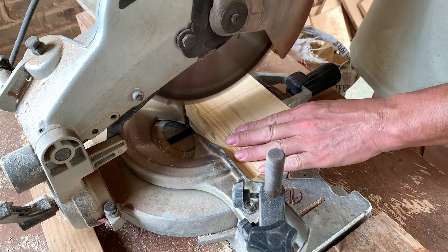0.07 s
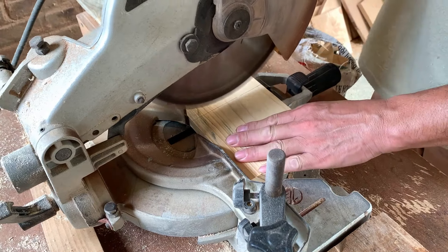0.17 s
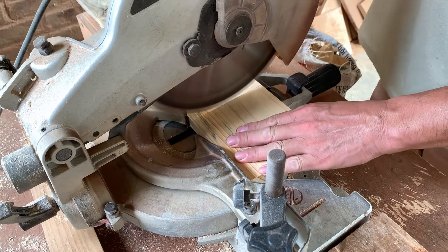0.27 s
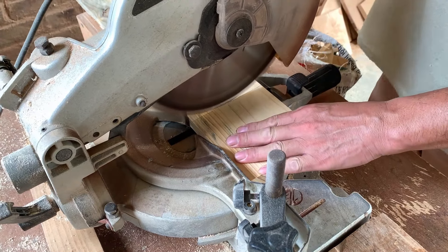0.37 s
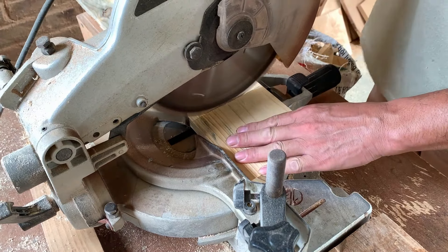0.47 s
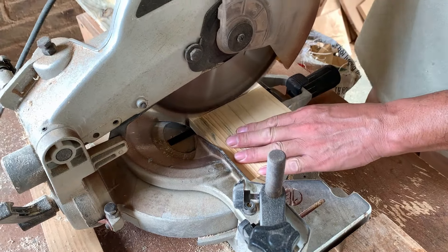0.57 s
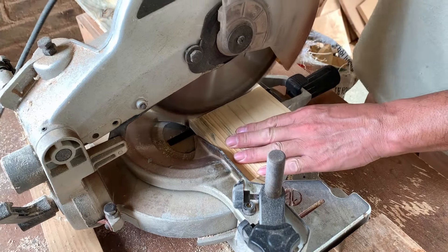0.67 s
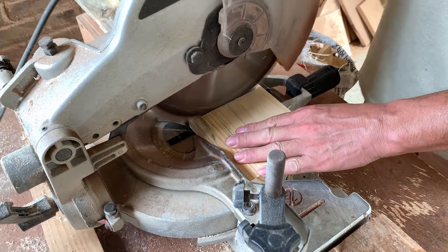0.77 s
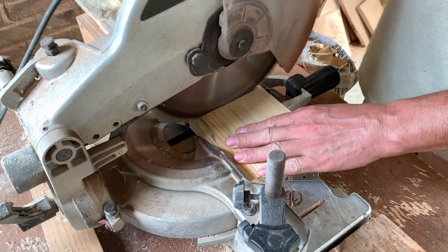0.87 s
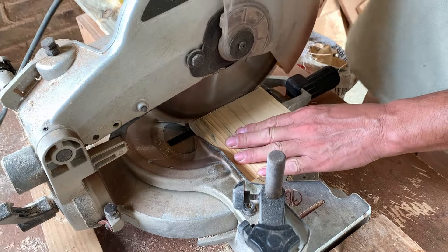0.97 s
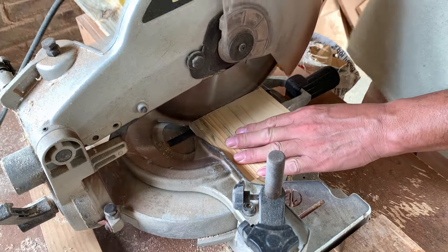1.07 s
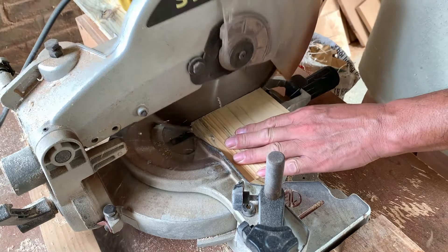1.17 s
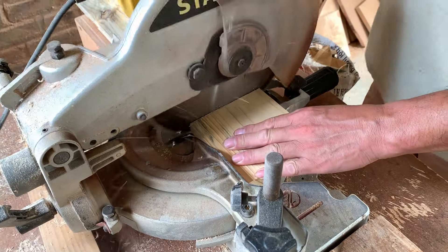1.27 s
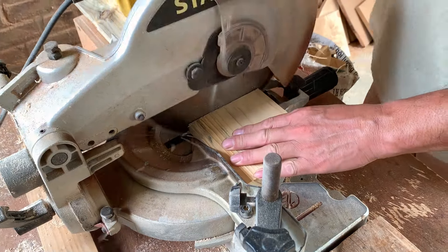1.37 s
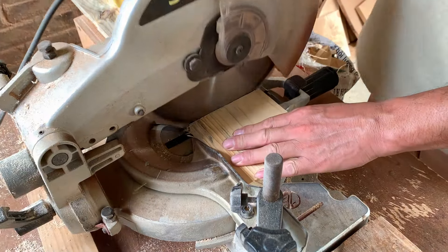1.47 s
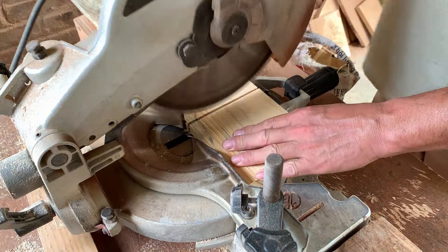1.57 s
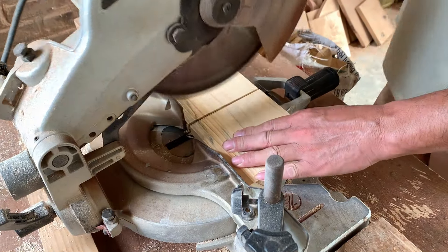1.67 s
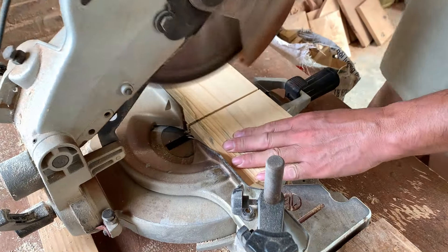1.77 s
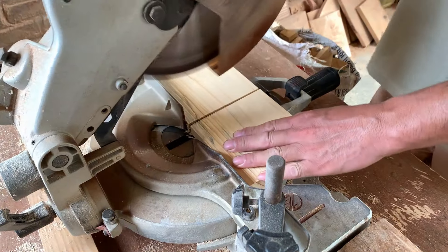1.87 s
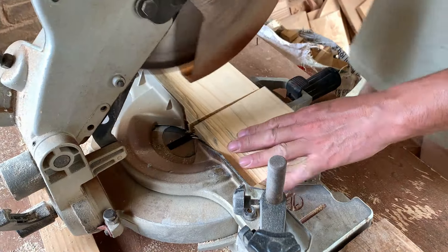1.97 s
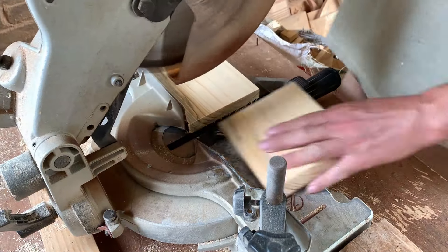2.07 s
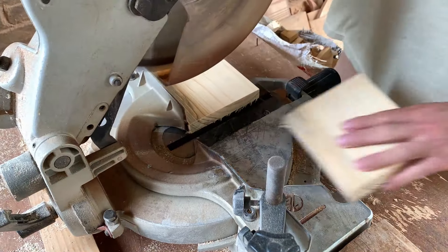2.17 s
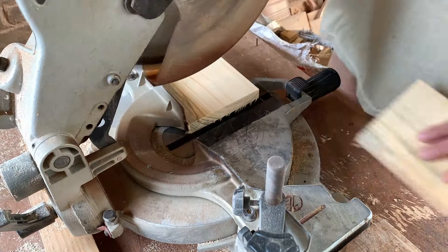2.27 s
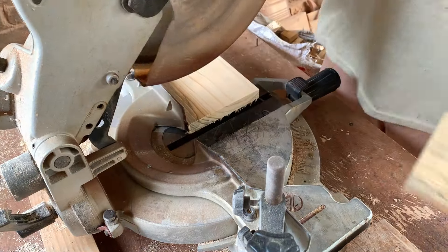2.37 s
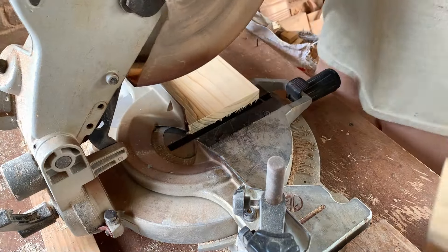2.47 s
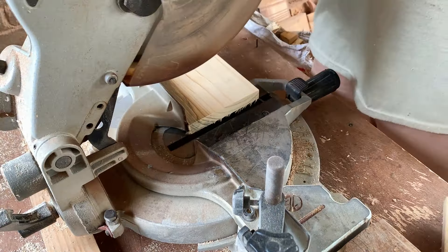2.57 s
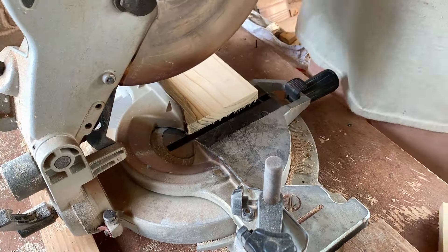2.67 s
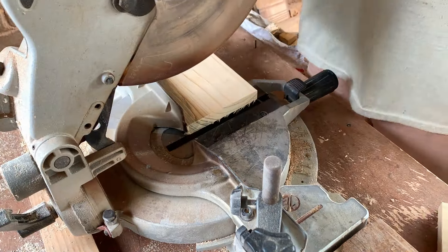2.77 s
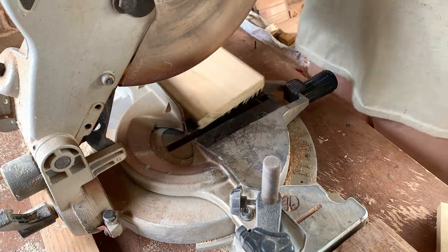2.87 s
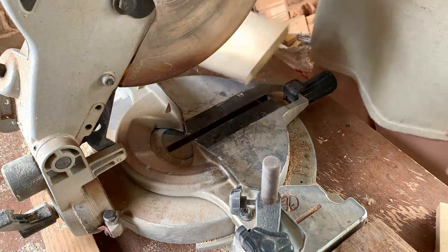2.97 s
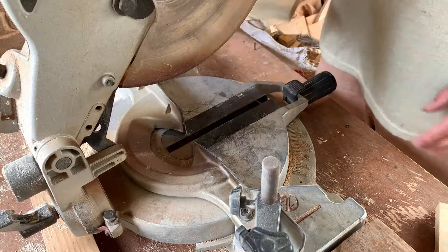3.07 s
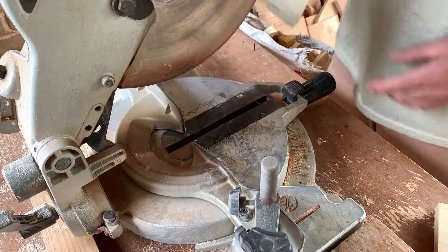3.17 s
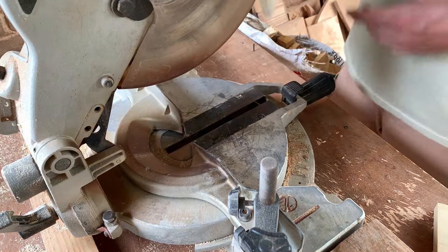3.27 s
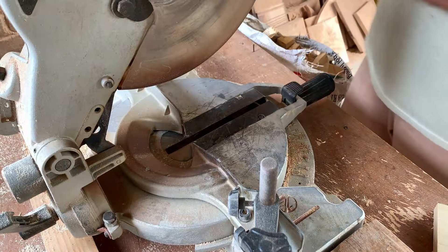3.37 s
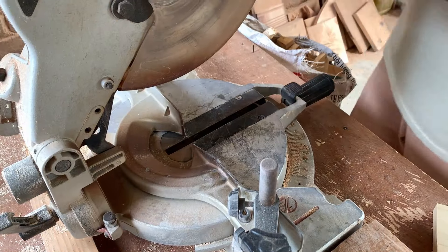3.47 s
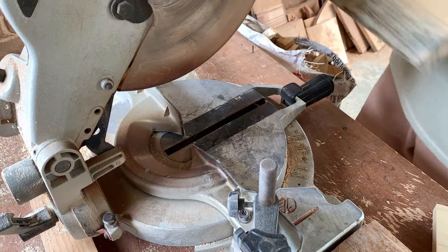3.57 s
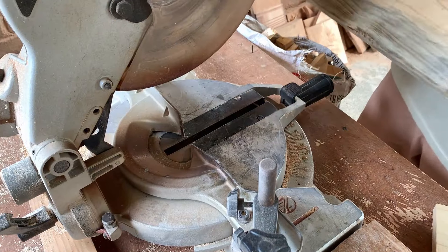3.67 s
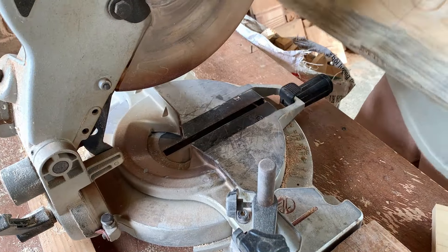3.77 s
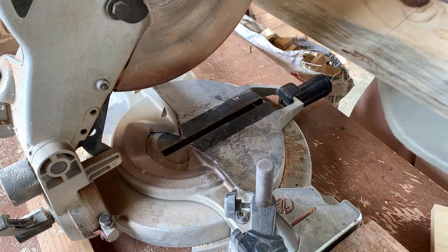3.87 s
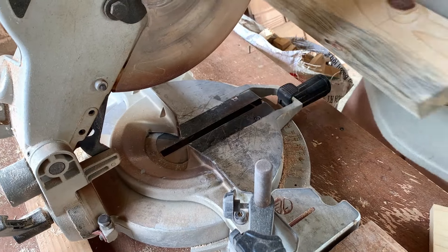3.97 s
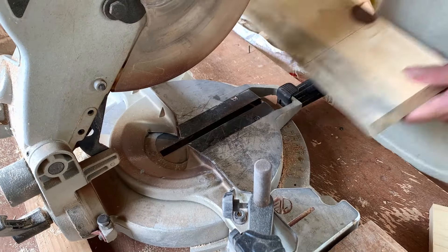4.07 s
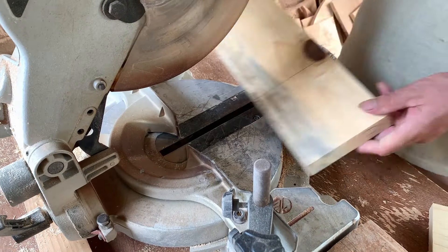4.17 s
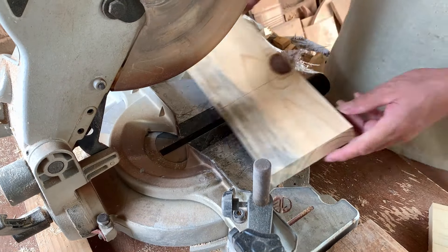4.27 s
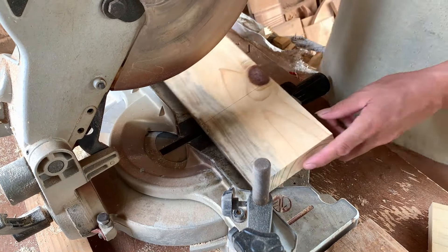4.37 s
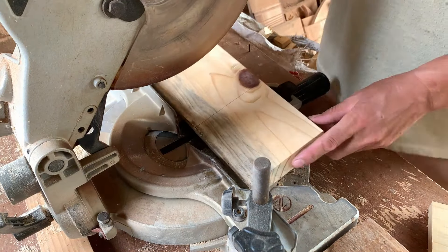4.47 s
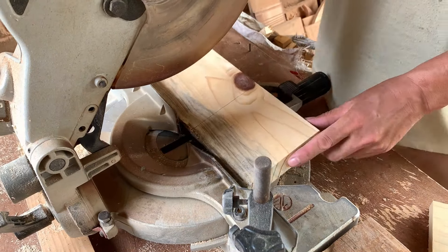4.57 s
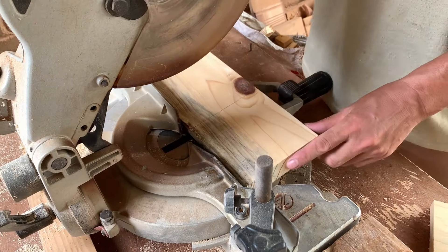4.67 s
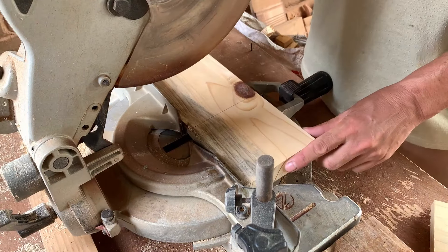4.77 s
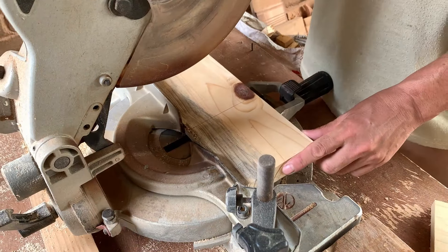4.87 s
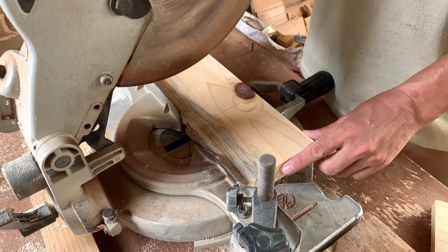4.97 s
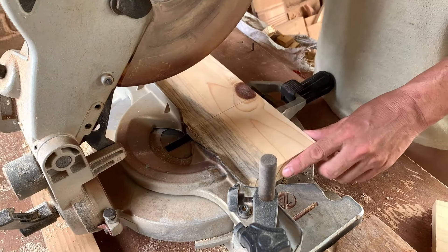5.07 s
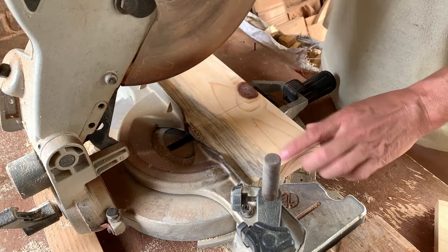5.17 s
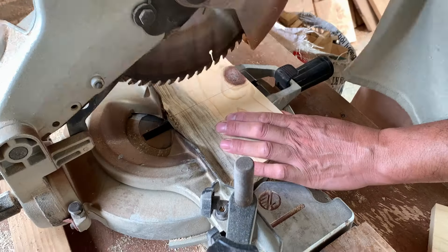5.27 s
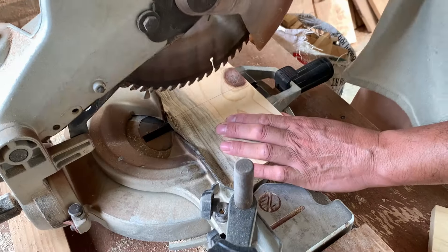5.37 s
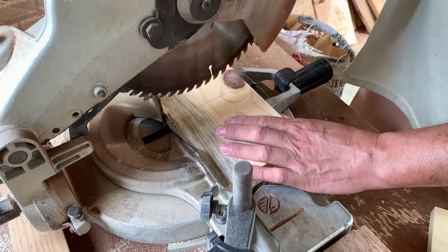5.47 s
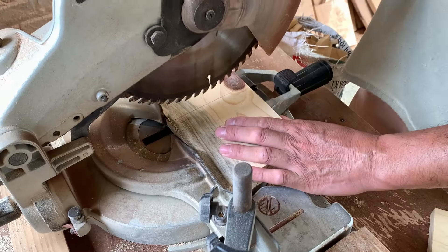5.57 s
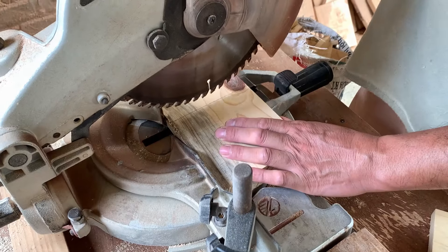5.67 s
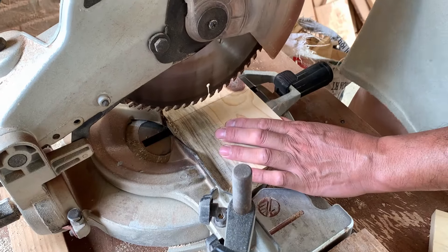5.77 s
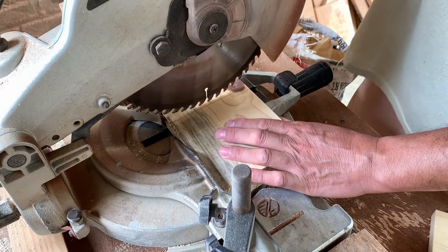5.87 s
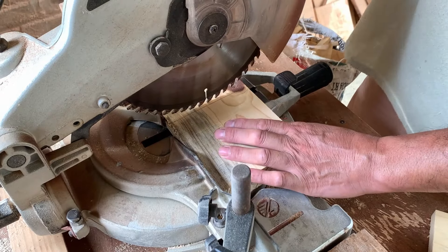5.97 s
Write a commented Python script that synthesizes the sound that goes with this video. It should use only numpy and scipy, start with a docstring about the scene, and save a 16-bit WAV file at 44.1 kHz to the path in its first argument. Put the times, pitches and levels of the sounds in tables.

```python
"""Miter saw cutting a pine block

A miter saw runs up, bogs down in a pine block, recovers and is switched off in a workshop.
Gear whine follows the motor speed as tones swept through fixed resonances; hiss and air are coloured noise.
Teeth rasp and ring the blade, and slack gears clash in bursts, many of them in step with the coasting blade.
Boards knock and slide as damped or swelling noise; the saw noise stops abruptly, leaving a faint far call
of three harmonics and one small metal ping of decaying modes."""
import sys
import numpy as np
from scipy import signal
from scipy.fft import rfft, irfft
from scipy.io import wavfile
from scipy.ndimage import uniform_filter1d, map_coordinates

SR = 44100
rng = np.random.default_rng(int(sys.argv[2]) if len(sys.argv) > 2 else 0)


def master_out(mix):
    """Clip the mix to full scale and print it as 16-bit PCM to the path in sys.argv[1]."""
    frames = np.transpose(np.atleast_2d(mix))
    ceiling = np.clip(frames, -1, 1)
    pcm = np.round(ceiling * 32767).astype(np.int16)
    wavfile.write(sys.argv[1], SR, pcm)


N = 265878
T = np.arange(N) / SR  # time [s]
HZ = np.maximum(np.fft.rfftfreq(N, 1 / SR), 1)  # spectrum frequencies [Hz]

# release of the switch: (time [s], gear mesh frequency [Hz])
RELEASE = (1.56, 2530)


def undb(db):
    """Logarithmic level: decibels to amplitude gain."""
    return 10 ** (np.asarray(db) / 20)


def curves(table):
    """Linear interpolation: each column of a table joined by straight lines in time."""
    s, *columns = np.transpose(table)
    return [np.interp(T, s, column) for column in columns]


def slope(points):
    """Spectral envelope: dB joined by straight lines on a log-frequency axis."""
    hz, db = np.transpose(points)
    return np.interp(np.log(HZ), np.log(hz), db)


def bumps(modes):
    """Resonance: bell-shaped peaks and dips in dB, summed."""
    return sum(db / (1 + (2 * (HZ - hz) / width) ** 2) for hz, width, db in modes)


def noise(db, likeness=0.033):
    """Diffuse field: coloured stereo noise of rms 1, nearly unrelated at the two ears."""
    white = rng.standard_normal((2, N))
    mixed = white + likeness * white[::-1]
    coloured = irfft(rfft(mixed) * undb(db), N)
    return coloured / coloured.std()


def walk(rate, channels=1):
    """Random modulation: smoothed steps at a rate in Hz, with a spread near 0.8."""
    step = max(int(SR / rate), 2)
    held = np.repeat(rng.standard_normal((channels, N // step + 1)), step, axis=1)
    return 1.01 * uniform_filter1d(held, step)[:, :N]


def turns(hz):
    """Phase as the integral of frequency: cycles run so far."""
    return np.cumsum(hz) / SR


def burst(s, length, rise=0.53, tail=0.4):
    """Transient envelope: a hyperbolic-secant swell with its peak at s and separate rise and tail."""
    out = np.zeros(N)
    near = slice(max(int((s - 4 * length) * SR), 0), int((s + 6 * length) * SR))
    u = (T[near] - s) / length
    out[near] = 1 / np.cosh(u / np.where(u < 0, rise, tail))
    return out


def tone(hz, blur=.8, blur_hz=90):
    """Multipath fading: a line reaches each ear by many paths, so its size and phase flutter."""
    paths = 1 + blur * (walk(blur_hz, channels=2) + 1j * walk(blur_hz, channels=2))
    carrier = np.exp(2j * np.pi * (turns(hz) + rng.random((2, 1))))
    line = np.real(paths / np.abs(paths) ** 0.13 * carrier)  # the power evens the size slightly
    return line / line.std()


def waver(x, depth_s, rate_hz=28):
    """Doppler-like shift: a wandering delay bends every pitch a little."""
    place = (T + depth_s * walk(rate_hz)[0]) * SR
    return np.array([map_coordinates(ear, [place], order=3, mode="mirror") for ear in x])


def reflections(share_db, count=40):
    """Comb filtering: close echoes from table, guard and bench ripple the spectrum at each ear."""
    echoes = np.zeros((2, N))
    for ear in echoes:
        lag = rng.uniform(0.0009975, .02, count)  # s
        ear[(lag * SR).astype(int)] = rng.standard_normal(count) * np.exp(-lag / .008)
    echoes = echoes / np.linalg.norm(echoes, axis=1, keepdims=True)
    response = 1 + rfft(echoes * undb(share_db))
    return response / np.sqrt(np.mean(np.abs(response) ** 2))


def speed():
    """Rotor dynamics: driven until release, then braked by steady friction and speed-proportional drag."""
    # motor speed under power, sagging in the wood: (time [s], gear mesh frequency [Hz])
    powered = [(0, 1340), (.1, 1795), (.22, 2200), (.38, 2527), (.6, 2484), (.95, 2282), (1.29, 1960),
               (1.45, 2390)]
    friction_hz_per_s, drag_per_s = 196, .2
    driven_hz, = curves(powered + [RELEASE])
    coasted = np.maximum(T - RELEASE[0], 0)
    friction_hz = friction_hz_per_s / drag_per_s
    return (driven_hz + friction_hz) * np.exp(-drag_per_s * coasted) - friction_hz


def gears(mesh_hz):
    """Gear meshing: harmonics of the tooth rate, smeared as the shaft jerks within its backlash."""
    # force on the gear teeth, greatest while the motor accelerates: (time [s], relative level [dB])
    tooth_load = [(0, -30), (.28, -23), (.48, -39), (.8, -43), (1.25, -49), (1.42, -40.5), (1.57, -51),
                  (1.71, -45.5), (1.86, -53), (2.2, -47.5), (2.6, -55.5), (5.35, -54.5)]
    # relative strength of mesh tone, octave and twelfth: level [dB]
    order_levels = [-0.5, -0.5, -3]
    # how well the gear case radiates a tone: (frequency [Hz], gain [dB])
    case = [(750, -5.5), (930, 2.5), (1130, -9), (1400, -3.5), (1650, -5), (1850, -8), (2050, -2),
            (2250, 1), (2430, 5.5), (2750, -2), (3300, -5.5), (4100, 1), (4500, 0), (4900, 7.5),
            (5500, -2.5), (6400, 2.5), (7400, -8)]
    overtone_db_per_octave = 2.5  # slower teeth strike more softly, so overtones fade with the speed
    fading_db = 2.5  # each tone comes and goes on its own

    load_db, = curves(tooth_load)
    soft_db = overtone_db_per_octave * np.log2(mesh_hz / RELEASE[1])
    jerk_hz = np.interp(T, [0, .3, 1.4], [100, 48, 38])
    jerky_hz = mesh_hz + jerk_hz * walk(190)[0]
    whine = 0
    for k, db in enumerate(order_levels):
        line = tone((k + 1) * jerky_hz, blur=1.2, blur_hz=170)
        whine = whine + line * undb(load_db + db + k * soft_db + fading_db * walk(35))
    # the resonances and ripple of the gear case colour the gliding tones
    return irfft(rfft(whine) * undb(slope(case)) * reflections(-4), N)


def chatter(mesh_hz):
    """Backlash impact: slack gears clash in bouts timed by blade turns, and in single hard blows."""
    # bouts of rattle: (first clash [s], end [s], interval [blade turns], level [dB])
    rattles = [(1.662, 1.775, 2.04, -29.5), (1.839, 1.98, 2.01, -34), (1.996, 2.325, 2.01, -37),
               (2.368, 2.665, 2.03, -35), (2.7, 2.95, 2.015, -37), (2.961, 3.1, 1, -33.5),
               (3.199, 3.4, 1.94, -35), (3.417, 3.54, 1.32, -36), (3.555, 3.73, .99, -35.5),
               (3.753, 3.94, 1.2, -36), (3.976, 4.065, 1, -34), (4.136, 4.28, .96, -35.5),
               (4.356, 4.58, .99, -35), (4.602, 4.86, 1.01, -38.5), (4.94, 5.04, 1.15, -37)]
    # single hard clashes: (time [s], level [dB], length [s])
    blows = [(0.031, -17.5, 0.0033), (.072, -24, .0036), (0.218, -19.5, 0.0083), (1.461, -30.5, .003),
             (1.497, -34, 0.0034), (1.537, -32.5, .009), (1.708, -35, .006), (1.728, -42, 0.0013),
             (1.949, -33, 0.0065), (1.968, -30.5, .006), (2.371, -31.5, 0.0073), (2.493, -32.5, .006),
             (2.555, -30, .007), (2.652, -32, .006), (2.803, -29.5, 0.0076), (2.868, -33.5, 0.0065),
             (2.909, -33, .005), (3.107, -30, 0.0065), (3.138, -33, 0.0079), (3.235, -31.5, .007),
             (3.315, -34.5, 0.0058), (3.5, -30, 0.0086), (3.833, -34.5, .009), (4.221, -34.5, 0.0045),
             (5.139, -32.5, 0.0083)]
    mesh_per_turn = 30  # mesh cycles in one blade turn
    clash_s, scatter_db = 0.0091, 0.7  # length and unevenness of the clashes in a bout

    blade_turns = turns(mesh_hz) / mesh_per_turn
    bouts = np.zeros(N)
    all_sizes = rng.standard_normal(size=(len(rattles), 24))
    for (start, end, step, db), sizes in zip(rattles, all_sizes):
        first, last = np.interp([start, end], T, blade_turns)
        times = np.interp(np.arange(first, last, step), blade_turns, T)
        for s, size in zip(times, sizes):
            bouts += undb(db + scatter_db * size) * burst(s, clash_s, rise=0.34, tail=0.48)
    single = sum(undb(db) * burst(s, length, rise=.32, tail=0.68) for s, db, length in blows)
    return np.maximum(bouts, single)


def housing(slow, modes_db):
    """Resonant radiation: noise through the gear housing, whose colour shifts as the motor slows."""
    # housing colour at high speed: (frequency [Hz], relative density [dB per Hz])
    fast_colour = [(530, -42), (900, -18.5), (1260, -25), (1340, -14.5), (2140, -6.5), (2890, -2),
                   (4200, -5.5), (4570, -0.5), (6480, -5), (7580, -13), (8350, -6), (10200, -12.5),
                   (13400, -10.5), (16000, -15.5)]
    # housing colour at low speed: (frequency [Hz], relative density [dB per Hz])
    slow_colour = [(530, -32.5), (900, -3), (1220, -9), (1340, -1.5), (1550, -11.5), (2170, -7.5),
                   (2450, -3), (2830, -2), (5820, -3.5), (7310, -12), (8350, -5), (9880, -14),
                   (12600, -11.5), (16000, -14)]
    at_speed = noise(slope(fast_colour) + modes_db)
    slowed = noise(slope(slow_colour) + modes_db)
    return np.sqrt(1 - slow) * at_speed + np.sqrt(slow) * slowed


def housing_rings(mesh_hz):
    """Forced resonance: a mesh overtone that sweeps across a housing mode makes it ring."""
    # housing modes: (frequency [Hz], level relative to the hiss [dB])
    modes = [(4570, -12), (2490, -7), (2520, -6), (1392, -13.5), (923, -14)]
    # overtone that drives each mode: harmonic number
    orders = [3, 2, 3, 1, 1]
    rings = 0
    for order, (hz, db) in zip(orders, modes):
        detuning = (order * mesh_hz - hz) / (0.076 * hz)
        ring = tone(np.full(N, hz), blur=1.3, blur_hz=130.2)
        rings = rings + undb(db) * ring / (1 + detuning ** 2)
    return rings


def air():
    """Turbulence noise: fan and blade stir air in the guard, whose low resonance takes over as they slow."""
    # air rushing through the guard: (time [s], relative level [dB])
    rush_levels = [(0, -33), (.25, -34.5), (.55, -38), (1.05, -39), (1.35, -48), (1.75, -49.5),
                   (2.1, -52.5), (2.75, -52.5), (3.6, -56), (5.35, -55)]
    # colour of the rush: (frequency [Hz], relative density [dB per Hz])
    colour = [(25, -16.5), (60, -10), (95, -5), (150, -3), (220, -0.5), (380, -4), (550, -1.5), (750, -2),
              (950, -3), (1300, -6), (2000, -2.5), (4000, -38.5)]
    # guard resonances at full speed: (frequency [Hz], width [Hz], height [dB])
    guard_fast = [(463, 180, -2), (650, 86, 1), (935, 83, 6.5), (1630, 170, -8.5)]
    # guard resonances while coasting: (frequency [Hz], width [Hz], height [dB])
    guard_slow = [(540, 150, 5), (768, 150, -5.5), (1390, 110, 6)]
    db, = curves(rush_levels)
    slow = np.interp(T, [1.5, 2], [0, 1])
    at_speed = noise(slope(colour) + bumps(guard_fast))
    coasting = noise(slope(colour) + bumps(guard_slow))
    rush = np.sqrt(1 - slow) * at_speed + np.sqrt(slow) * coasting
    return rush * undb(db + 2.6 * walk(45, channels=2))


def motor(mesh_hz):
    """Source and resonator: whine, hiss and air, with gear clashes swelling them and ringing the housing."""
    # brush and bearing hiss: (time [s], relative level [dB])
    hiss_levels = [(0, -22.5), (.12, -22), (.28, -20), (.6, -26.5), (1, -35), (1.27, -31), (1.45, -37.5),
                   (1.8, -39.5), (2.03, -43), (2.2, -37), (2.5, -43), (3.4, -43.5), (3.65, -44), (4.1, -42),
                   (4.6, -43.5), (5.35, -43)]
    # housing resonances: (frequency [Hz], width [Hz], height over the slope [dB])
    housing_modes = [(1348, 90, 0.5), (2470, 220, 3.5), (4700, 110, 2), (5856, 410, 2), (7720, 450, -7),
                     (7840, 680, 5.5), (12380, 610, 1)]
    # metal modes that stand out in each clash: (frequency [Hz], width [Hz], height [dB])
    clash_modes = [(3900, 400, 3.5), (4710, 150, 6.5), (5160, 130, 4), (5810, 230, 5), (6740, 200, 5.5),
                   (8200, 350, 7.5), (12800, 3200, 5.5)]
    treble_db, cut_treble_db = 2.5, 4  # lift of the hiss above 8 kHz, and more of it in the wood
    mains_hz = 50

    hiss_db, = curves(hiss_levels)
    lift_db = treble_db + cut_treble_db * np.interp(T, [.35, .6, 1.1, 1.25], [0, 1, 1, 0])
    slow = np.interp(T, [2.6, 4.1], [0, 1])
    clash = chatter(mesh_hz)
    steady = undb(hiss_db + 1.7 * walk(130, channels=2))
    steady_hiss = steady * housing(slow, bumps(housing_modes))
    clash_hiss = clash * housing(slow, bumps(housing_modes) + bumps(clash_modes))
    hiss = steady_hiss + clash_hiss
    treble = signal.sosfilt(signal.butter(1, 8000, "high", fs=SR, output="sos"), hiss)
    # the gear teeth strike once a mesh cycle
    strikes = 1 + 0.16 * np.cos(2 * np.pi * turns(mesh_hz))
    hiss = (hiss + (undb(lift_db) - 1) * treble) * strikes * undb(0.6 * walk(1500) - 2.5)

    swell = np.hypot(steady, clash) / undb(hiss_db)
    whine = gears(mesh_hz) * swell ** 1.53 * undb(-2.0 + 2.2 * walk(70, channels=2))
    rings = np.hypot(.7 * steady, clash) * housing_rings(mesh_hz)
    # the heavy starting current makes the torque throb at twice the mains frequency
    throb_depth = np.interp(T, [0, .35, 1.5], [.25, .15, 0])
    throb = 1 + throb_depth * np.cos(2 * np.pi * 2 * mains_hz * T)
    return (hiss + whine + rings) * throb + air() * swell ** 0.16


def roar():
    """Structure-borne sound: starting torque shakes the frame, dying away as the rotor gathers speed."""
    # starting roar: (time [s], level [dB])
    jolt = [(0, -21.5), (.035, -19), (.06, -30), (.12, -35.5), (.2, -30), (.27, -38), (.36, -48.5),
            (.5, -71), (.6, -120)]
    # frame resonances: (frequency [Hz], width [Hz], height [dB])
    frame = [(150, 130, 3.5), (715, 810, 7.3), (1140, 610, 22), (1353, 170, 6.5), (2984, 350, 21),
             (3800, 300, 13)]
    # frequency [Hz], relative density [dB per Hz]
    colour = [(40, -12), (75, 1), (130, 3), (200, 3.5), (450, -12), (600, -3.5), (1500, -16.5),
              (4500, -3.5), (8000, -38.5)]
    db, = curves(jolt)
    return noise(bumps(frame) + slope(colour)) * undb(db + 2.7 * walk(120, channels=2))


def still_air():
    """Background noise: quiet coloured air whose level wanders slowly."""
    # still air: (frequency [Hz], relative density [dB per Hz])
    quiet = [(25, -5.5), (75, 0.5), (260, -18), (500, -18.5), (850, -7), (1150, -21.5), (1900, -18.5),
             (2500, -34), (7000, -31), (9000, -20.5), (16000, -30)]
    return noise(slope(quiet)) * undb(-76.5 + 1.2 * walk(15))


def cutting(mesh_hz, teeth_per_mesh=1.27):
    """Forced vibration: teeth tear the wood and ring the blade, whose modes shift as the slot grips it."""
    # the cut: (time [s], relative level [dB], depth in the wood [0-1])
    cut = [(.345, -48, 0.1), (.375, -18.5, .45), (.46, -23, 0), (.52, -18, 0.37), (.6, -23.5, 0.8),
           (.76, -21, 1), (1.07, -25, 0.99), (1.265, -25, 1), (1.33, -66, 1)]
    # colour of the rasp: (frequency [Hz], relative density [dB per Hz])
    rasp_colour = [(290, -50.5), (500, -33.5), (1130, -8), (1870, -12), (2230, -23.5), (2500, -4.5),
                   (4030, -9), (5390, -5), (5800, -7), (6230, -3.5), (7640, -2.5), (8330, -5.5), (9770, -4),
                   (12300, -4), (16000, -10.5)]
    # blade modes at the entry: (frequency [Hz], width [Hz], height over the rasp [dB])
    entry_modes = [(2740, 160, 7.5), (3060, 120, 3.5), (3600, 400, -13), (4720, 100, 9), (4873, 110, 14),
                   (5560, 120, 20), (7400, 110, 11), (7620, 170, -13), (8000, 180, 13.5), (9140, 120, 14),
                   (10800, 130, 5.5), (12000, 240, 12), (12500, 140, 10.5), (12860, 90, 12)]
    # blade modes deep in the slot: (frequency [Hz], width [Hz], height over the rasp [dB])
    deep_modes = [(1124, 217, -2), (2940, 98, 7), (3750, 150, 9.5), (4230, 280, -6.5), (5390, 110, 13.5),
                  (6140, 70, 10), (6360, 200, 12), (7150, 75, 10.5), (7360, 64, -5.5), (7800, 300, -5.5),
                  (8400, 200, 10), (9400, 150, 6), (11900, 220, -3.5)]
    # blade squeals: (time [s], frequency [Hz], level [dB], length [s])
    squeal_events = [(.386, 8170, -21, 0.011), (.4, 8170, -17.5, 0.0092), (.433, 8150, -23, .008),
                     (.437, 5370, -14.5, .007), (.462, 2550, -30, 0.0042), (.48, 5380, -29.5, .012),
                     (.507, 2556, -27, .01), (.511, 5430, -19.5, 0.0065)]
    blade_wobble_s = .00016  # the flexing blade makes its modes waver

    db, depth = curves(cut)
    depth = np.clip(depth, 0, 1)
    rasp = slope(rasp_colour)
    entry = noise(rasp + bumps(entry_modes))
    deep = noise(rasp + bumps(deep_modes))
    blade = np.sqrt(1 - depth) * entry + np.sqrt(depth) * deep
    tooth_hz = teeth_per_mesh * mesh_hz + 85 * walk(150)[0]
    teeth = undb(-14.0) * depth * tone(tooth_hz, blur=1.1, blur_hz=191.3)
    grain = undb(1.5 * walk(110) + 1.2 * walk(1800))  # hard and soft fibres
    in_wood = (T > cut[0][0]) * (T < cut[-1][0])
    squeals = 0
    for s, hz, peak_db, length in squeal_events:
        squeal = tone(np.full(N, hz), blur=0.13, blur_hz=78.1)
        squeals = squeals + undb(peak_db) * burst(s, length) * squeal
    return (waver(blade, blade_wobble_s) + teeth) * grain * undb(db) * in_wood + squeals


def strain(mesh_hz):
    """Subharmonic vibration: the labouring drive groans an octave under the mesh and shakes the bench."""
    # strain on the drive: (time [s], level [dB])
    labour = [(0, -100), (.5, -61), (.85, -44), (1.25, -44.5), (1.35, -55), (1.52, -70), (1.7, -110)]
    db, = curves(labour)
    groan = tone(mesh_hz / 2 + 35 * walk(120)[0], blur=1.4, blur_hz=164.7)
    bench = noise(slope([(40, -24), (85, -7), (130, -2), (190, -8.5), (330, -9.5), (600, -36.0)]))
    return undb(db) * (groan + undb(-5.5) * bench)


def graze():
    """Friction noise: the rising blade brushes the cut face, one short swell of bright noise."""
    # the graze: (time [s], level [dB], length [s])
    touch = (1.638, -32, 0.049)
    s, db, length = touch
    brush = noise(slope([(1000, -16), (3000, -2), (8500, 2), (16000, -7)]))
    return undb(db) * burst(s, length) * brush


def boards():
    """Damped impact: boards picked up and set down give dull band-limited knocks with exponential decay."""
    # knocks: (time [s], level [dB], time to fall 60 dB [s], lowest [Hz], highest [Hz])
    knocks = [(2.44, -54, 1, 119, 200), (2.7, -45.5, .4, 300, 1148), (2.765, -39, 0.14, 445, 540),
              (3.042, -55, 0.34, 30, 136), (3.221, -52, 0.29, 125, 230), (4.33, -45, 0.18, 45, 159.7),
              (4.415, -52.5, .15, 30, 108.8), (4.602, -36.5, 0.065, 705, 1024),
              (4.604, -39.5, 0.048, 160, 703.6), (5.385, -65, .11, 705, 1030),
              (5.517, -65, .088, 250, 1100)]
    out = np.zeros((2, N))
    t = T[:SR // 3]
    for s, db, ring, low_hz, high_hz in knocks:
        band = signal.butter(3, [low_hz, high_hz], "band", fs=SR, output="sos")
        shared = 0.36 * rng.standard_normal(len(t))
        wood = signal.sosfilt(band, rng.standard_normal((2, len(t))) + shared)
        start = int(s * SR)
        decay = np.exp(-np.log(1000) * t / ring)
        out[:, start:start + len(t)] += undb(db) * wood / wood.std() * decay
    return out


def slide():
    """Friction noise: the next board scrapes over the table in swells of coloured noise."""
    # pushes: (time [s], level [dB], length [s])
    pushes = [(4.856, -46, .06), (4.924, -39, 0.099), (5.138, -43.5, 0.047), (5.295, -43, 0.13)]
    # colour of the scrape: (frequency [Hz], relative density [dB per Hz])
    colour = [(300, -20.5), (900, -11), (1220, -11), (1350, 4.5), (1520, -10), (2100, -2.5), (2420, 3),
              (2800, -3.5), (3600, -2.5), (5500, -3.5), (7300, -13), (8400, -5), (10000, -17),
              (16000, -12.5)]
    push = sum(undb(db) * burst(s, length) for s, db, length in pushes)
    return push * noise(slope(colour)) * undb(2.3 * walk(150))


def far_call():
    """Harmonic series: a far rooster-like call, alike in pitch at both ears, wavers on its way."""
    # the call: (time [s], pitch [Hz], level [dB])
    glide = [(5.36, 381, -91), (5.44, 404, -83), (5.55, 410, -93), (5.6, 487, -80.5), (5.66, 514, -79),
             (5.8, 528, -74.5), (5.86, 537, -89.5), (5.95, 538, -100)]
    hz, db = curves(glide)
    phase = 2 * np.pi * turns(hz + 5 * walk(50)[0])
    call = 0
    for k, part_db in enumerate([1, -14, -13], 1):
        call = call + undb(db + part_db + 2 * walk(25, channels=2)) * np.sin(k * phase)
    return call * (T > glide[0][0])


def ping():
    """Modal decay: a light touch on a small metal part clicks and rings a few high modes."""
    # modes: (frequency [Hz], level [dB], time to fall 60 dB [s])
    modes = [(2976, -74, 0.062), (4430, -68.5, .09), (4950, -66.5, 0.078), (8800, -49, 0.061),
             (12800, -61, 0.069)]
    ping_s = 5.956
    t = np.maximum(T - ping_s, 0)
    ring = 0
    for hz, db, t60 in modes:
        phase = 2 * np.pi * hz * t + 0.93 * rng.standard_normal((2, 1))
        ring = ring + undb(db) * np.sin(phase) * np.exp(-np.log(1000) * t / t60)
    click = noise(slope([(1000, -20), (4000, -5.5), (16000, 0.5)]))
    click = click * burst(ping_s + 0.0038, 0.0085) * undb(-68)
    return ring * np.minimum(t / 0.0034, 1) + click


def scene():
    """Superposition: the saw, its shrill side a little to the right, with boards and quiet surroundings."""
    # level difference, left minus right: (frequency [Hz], difference [dB])
    lean = [(60, -7), (110, -0.5), (200, 1.5), (380, -1), (700, -3), (1290, -1.5), (2380, 1.5),
            (4400, -2.5), (8120, -4), (15000, 1)]
    stop_s = 5.346
    mesh_hz = speed()
    after = np.maximum(T - stop_s, 0)
    # the saw noise stops abruptly, with a short weak tail
    running = np.maximum(np.exp(-after / 0.0024), undb(-15.5) * np.exp(-after / 0.011))
    ears = reflections(-8) * undb(slope(lean) * np.array([[.5], [-.5]]))
    saw = motor(mesh_hz) + roar() + cutting(mesh_hz) + strain(mesh_hz) + graze() + slide()
    saw = irfft(rfft(saw) * ears, N)
    return saw * running + still_air() + boards() + far_call() + ping()


def record(dry):
    """Band limiting: a steep elliptic low-pass cuts the top."""
    top_hz = 15850
    return signal.sosfilt(signal.ellip(12, .1, 90, top_hz, fs=SR, output="sos"), dry)


dry = scene()
out = record(dry)
master_out(out)
```